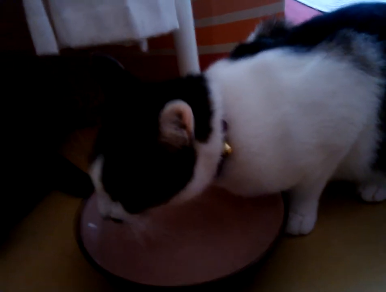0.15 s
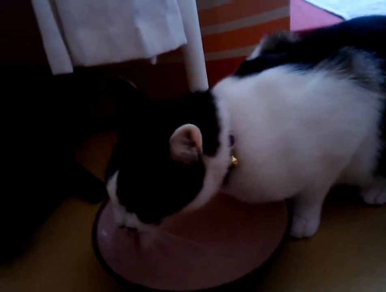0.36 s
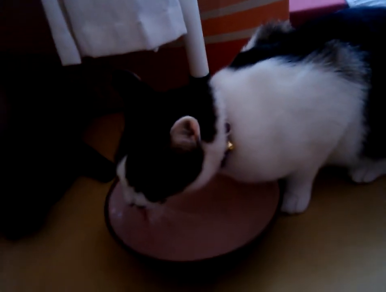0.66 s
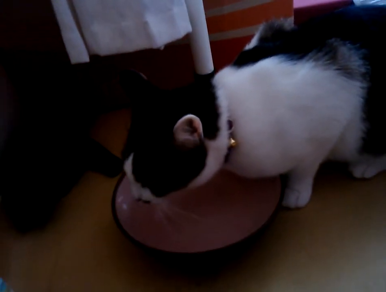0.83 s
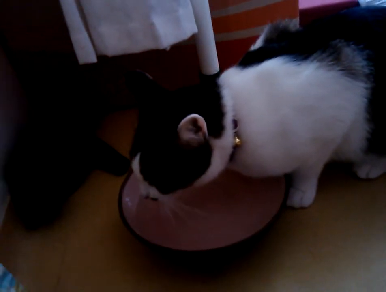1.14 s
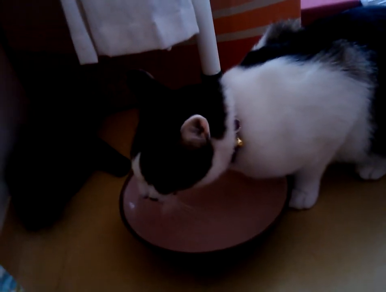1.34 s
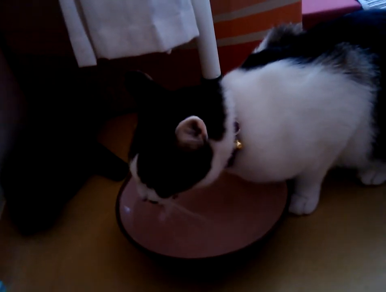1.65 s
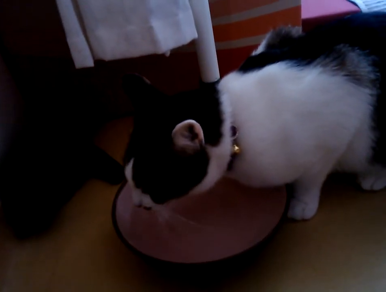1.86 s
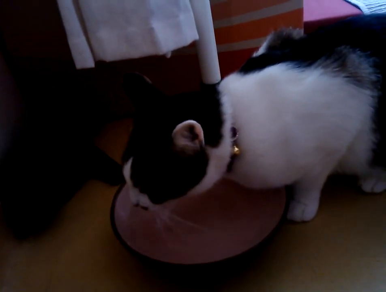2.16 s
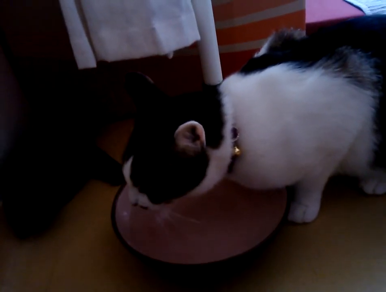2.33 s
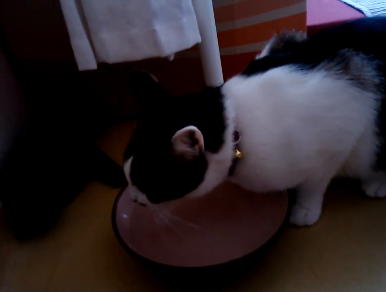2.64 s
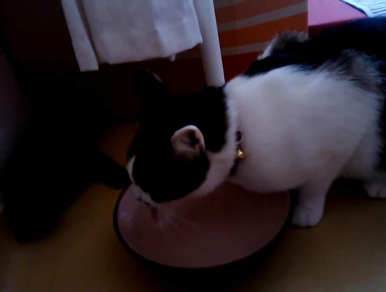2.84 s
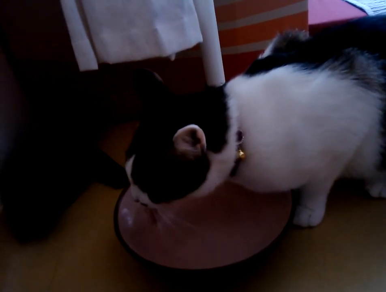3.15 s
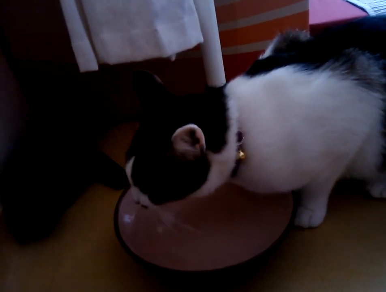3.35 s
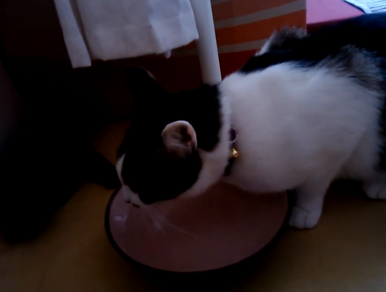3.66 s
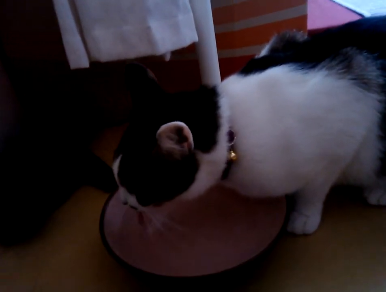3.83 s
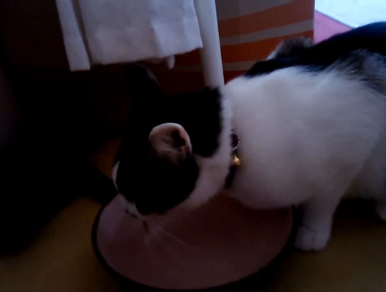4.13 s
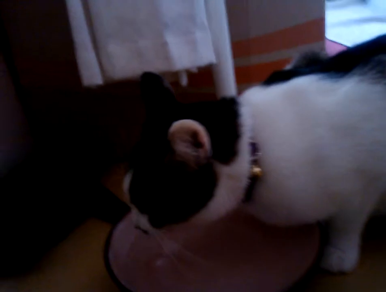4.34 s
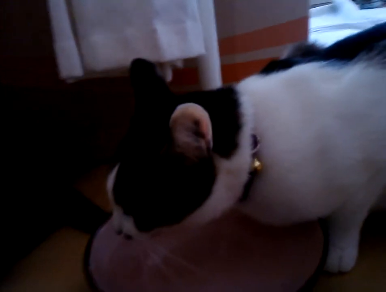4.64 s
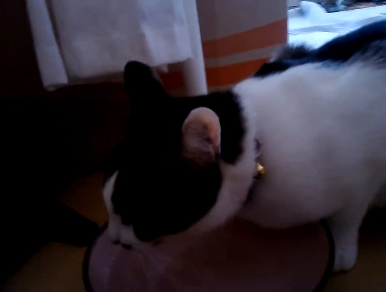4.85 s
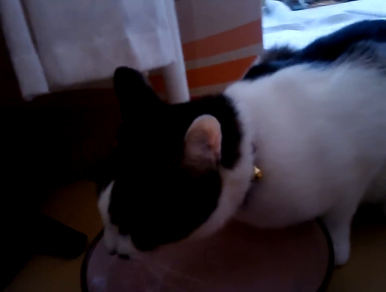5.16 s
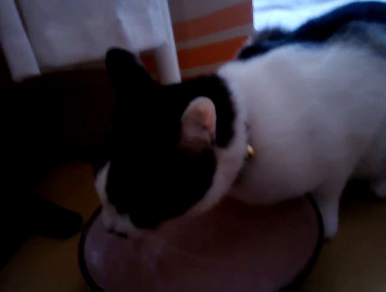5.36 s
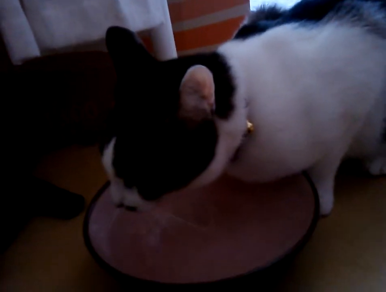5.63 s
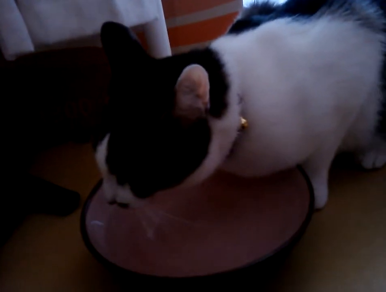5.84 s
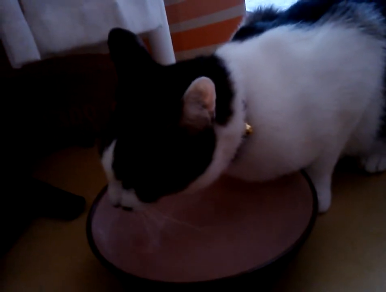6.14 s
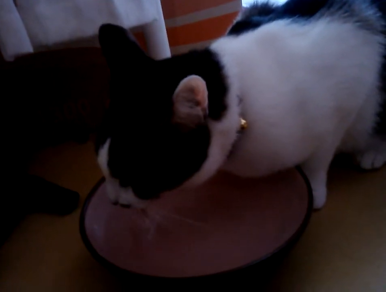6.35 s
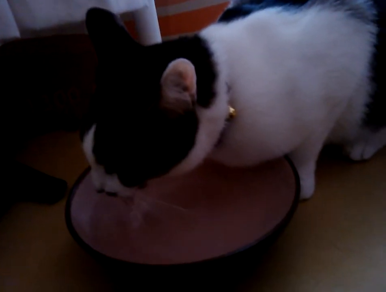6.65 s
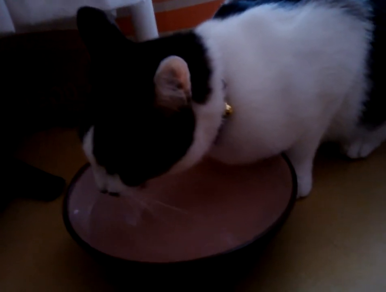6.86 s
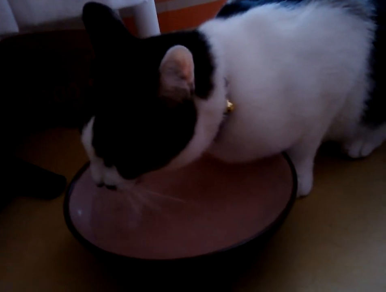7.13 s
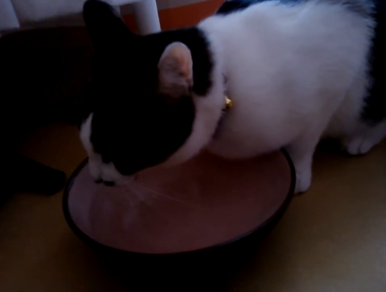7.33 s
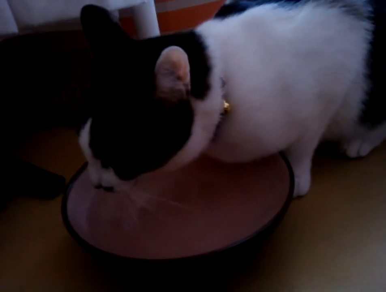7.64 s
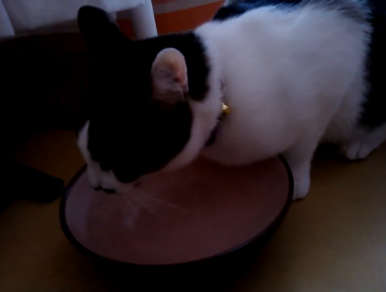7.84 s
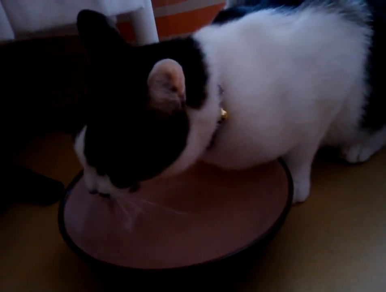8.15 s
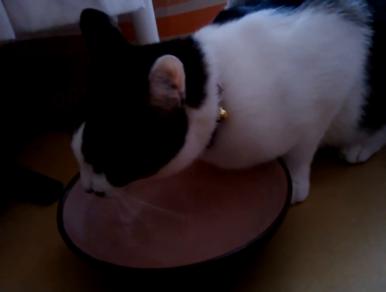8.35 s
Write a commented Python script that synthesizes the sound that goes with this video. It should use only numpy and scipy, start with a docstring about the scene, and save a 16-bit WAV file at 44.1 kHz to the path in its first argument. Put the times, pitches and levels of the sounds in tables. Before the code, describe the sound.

Close to the microphone, a cat drinks from a wide bowl. Small, high, wet clicks come in a loosely steady rhythm of about three laps a second, with scattered popping droplets and dull little plops between. Later laps grow splashier, with sharp bright spits and fine spray. Behind them lie a low wavering room rumble, faint hum and gentle hiss; the small room adds only a short tail.

```python
"""A cat laps water from a wide bowl in a quiet home, about three laps a second.
From the start, filtered noise gives room rumble, a wavering hum and hiss; faint clicks ring in the bowl as a trickle.
Soon the surface plops (single pulses), drops pop (damped sines of rising pitch) and bright noise bursts spit.
Then come the laps: each drags a clump of small bubbles under, with ticks, a dull slosh and stray drops after it.
Later, fine spray flies off the tongue and a few big bubbles gulp; the bowl echoes and the room adds a short tail."""
import sys
import numpy as np
from scipy import signal
from scipy.fft import rfft, irfft, next_fast_len
from scipy.io import wavfile

SR = 44100
rng = np.random.default_rng(int(sys.argv[2]) if len(sys.argv) > 2 else 0)


def log_audio(samples):
    """Write samples as a 16-bit WAV file to the path given in sys.argv[1]."""
    # one column per channel
    frames = np.atleast_2d(samples).T
    # limit to full scale, then quantise
    limited = np.clip(frames, -1, 1)
    pcm = np.round(limited * 32767).astype(np.int16)
    wavfile.write(sys.argv[1], SR, pcm)


N = 374320

# Laps, a clump of bubbles each. Each row: start in seconds, length in seconds,
# loudest moment as a share of the length (0-1), rms level in dB, bubble pitch in Hz.
LAPS = [(0.261, 0.059, 0.66, -59.5, 2280), (0.556, 0.038, 0.2, -57, 2040), (0.584, 0.05, 0.2, -69, 1890),
        (0.865, 0.084, 0.45, -60.5, 2140), (1.157, 0.071, 0.67, -57.5, 2050), (1.253, 0.07, 0.5, -75, 2500),
        (1.478, 0.043, 0.4, -49.5, 2110), (1.518, 0.028, 0.1, -62, 2080), (1.875, 0.047, 0.7, -57.5, 2140),
        (1.983, 0.03, 0.4, -65, 2680), (2.161, 0.027, 0.4, -61, 2250), (2.439, 0.056, 1, -57.5, 1950),
        (2.743, 0.065, 0.7, -61, 2140), (2.969, 0.025, 0.2, -59, 2230), (3.046, 0.045, 0.14, -55.5, 2090),
        (3.327, 0.055, 0.25, -61, 1990), (3.738, 0.036, 0.5, -63.5, 2200), (3.993, 0.09, 0.3, -64, 1970),
        (4.332, 0.069, 0.65, -58.5, 2080), (4.666, 0.044, 0, -58, 2210), (4.949, 0.036, 0.6, -62, 2240),
        (5.195, 0.091, 0.2, -58.5, 1940), (5.484, 0.061, 0.8, -55, 2340), (5.912, 0.036, 0, -58, 2130),
        (6.012, 0.042, 0.5, -67, 2420), (6.209, 0.038, 0.74, -58, 2250), (6.461, 0.081, 0.93, -57.5, 2180),
        (6.775, 0.082, 0.3, -60.5, 2160), (7.084, 0.057, 0.26, -59.5, 2130),
        (7.396, 0.043, 0.13, -53.5, 2270), (7.511, 0.028, 0.4, -62, 2470), (7.679, 0.039, 0.96, -54, 2330),
        (8.098, 0.031, 0.3, -58, 2240), (8.376, 0.039, 0.7, -59, 2310)]
WATER_LOW_HZ, MIC_HIGH_HZ = 1540, 6720   # tiny bubbles radiate no bass; the microphone dulls the top
DROP_LOW_HZ = 2160   # lowest pitch of a stray drop, and the pitch to which the drops' climb refers


def amp(db):
    """dB to gain."""
    return 10 ** (np.asarray(db) / 20)


def rms_one(x):
    """Scale to rms 1."""
    return x / np.sqrt(np.mean(x ** 2) + 1e-20)


def coloured(spectrum):
    """Noise shaped by (Hz, relative dB per Hz) points, then scaled to rms 1."""
    size = next_fast_len(N)
    hz = np.maximum(np.arange(size // 2 + 1) * SR / size, 1)
    points = np.array(spectrum)
    gain = amp(np.interp(np.log(hz), np.log(points[:, 0]), points[:, 1]))
    white = rng.standard_normal(size)
    return rms_one(irfft(rfft(white) * gain, size)[:N])


def resonance(x, hz, width_hz):
    """Two-pole resonance, gain 1 on top."""
    r = np.exp(-np.pi * width_hz / SR)
    forward = np.array([1, 0, -1]) * (1 - r * r) / 2
    feedback = [1, -2 * r * np.cos(2 * np.pi * hz / SR), r * r]
    return signal.lfilter(forward, feedback, x)


def add(out, s, sound):
    """Mix a short sound in at time s."""
    i = int(np.clip(round(s * SR), 0, len(out)))
    out[i:i + len(sound)] += sound[:len(out) - i]


def bubble(hz, t60, rise, attack_s):
    """A damped sine, envelope peak 1, whose pitch climbs by 2 * rise over t60 as the bubble nears the surface."""
    t = np.arange(int(t60 * SR) + 8) / SR
    shape = (1 - np.exp(-t / attack_s)) ** 2 * amp(-60 * t / t60)
    cycles = hz * t * (1 + rise * t / t60)
    return shape / shape.max() * np.sin(2 * np.pi * cycles)


def air():
    """Steady hiss, the rumble under 160 Hz swelling at random and along a set course, and a narrow hum."""
    # Room rumble and hiss. Each row: frequency in Hz, relative level in dB per Hz.
    air_colour = [(28, -47), (41, -19), (52, -3), (78, 2.5), (160, -8.5), (190, -12), (260, -16),
                  (1300, -23), (3500, -28.5), (6300, -31), (7300, -39), (8050, -54), (8800, -50.5),
                  (9500, -45), (10000, -64)]
    # Course of the rumble. Each row: time in seconds, level in dB (only the departure from the mean counts).
    rumble_course = [(0.0, -48), (3.26, -51.5), (3.66, -49.5), (4.68, -52), (4.8, -47.5), (6.22, -51.5),
                     (7.4, -47.5), (8.44, -51), (8.49, -43.5)]
    air_db, hum_db = -48, -58
    hum_hz, hum_width_hz = 119.6, 7.9   # width of each of two passes
    wander_db, wander_hz = 1, 4.9

    noise = coloured(air_colour)
    low = signal.sosfiltfilt(signal.butter(2, 160, fs=SR, output="sos"), noise)
    r = np.exp(-2 * np.pi * wander_hz / SR)
    # the first second lets the slow filter settle
    wander = signal.lfilter([1], [1, -2 * r, r * r], rng.standard_normal(N + SR))[SR:]
    s, db = np.transpose(rumble_course)
    course_db = np.interp(np.arange(N) / SR, s, db - np.mean(db))
    swell = amp(course_db + wander_db * rms_one(wander))
    hum = rng.standard_normal(N)
    for _ in range(2):
        hum = resonance(hum, hum_hz, hum_width_hz)
    return amp(air_db) * (noise + (swell - 1) * low) + amp(hum_db) * rms_one(hum)


def trickle(per_s=60, level_db=-71):
    """Faint stray droplets, random clicks of uneven size, ring in the bowl all along."""
    # Air in the bowl. Each row: resonance in Hz, width of each of two passes in Hz, relative level in dB.
    bowl_modes = [(2095, 600, 1.5), (2380, 1200, -12)]
    size = amp(3.1 * np.minimum(rng.exponential(1, N), 3))
    clicks = (rng.random(N) < per_s / SR) * size
    rings = np.zeros(N)
    for hz, width_hz, db in bowl_modes:
        once = resonance(clicks, hz, width_hz)
        rings += amp(db) * resonance(once, hz, width_hz)
    return amp(level_db) * rms_one(rings)


def plops():
    """The surface closes dully: one pull and one push, centred on the plop's time."""
    # Each row: centre in seconds, nominal level in dB, nominal pitch in Hz.
    plop_rows = [(0.0727, -58, 350), (0.6665, -44, 330), (0.8772, -45, 353), (1.183, -43, 380),
                 (1.4798, -50, 380), (2.466, -44, 453), (2.7655, -42.5, 620), (3.3316, -44, 376),
                 (3.732, -43, 530), (3.8513, -34, 565), (5.1644, -44, 450), (5.2315, -46, 297),
                 (5.476, -42, 410), (5.8499, -41, 403), (5.853, -42, 302), (6.299, -43, 530),
                 (6.4948, -41.5, 413), (6.529, -43, 326), (7.4022, -47, 350), (7.682, -45, 330),
                 (8.0716, -44, 330), (8.0977, -44, 410)]
    out, half = np.zeros(N), 300   # half a plop in samples
    for s, level_db, hz in plop_rows:
        u = np.arange(-half, half) / SR * 2 * np.pi * 0.95 * hz
        pulse = 3.04 * u / (1 + u * u) ** 1.53
        add(out, s - half / SR, amp(level_db) * pulse)
    return out


def strays():
    """Fainter drops fall at random as the water settles after each lap; rows of start, level, pitch and t60."""
    per_lap, mean_wait_s = 4, .12
    base_db, uneven_db, db_per_octave = -53, 3, -6
    above, typical_t60_s = .13, 0.011   # pitch lies an exponential share above the lowest

    wait, height = rng.exponential(1, (2, len(LAPS), per_lap))
    size, ring = rng.standard_normal((2, len(LAPS), per_lap))
    s = np.array(LAPS)[:, :1] + mean_wait_s * wait
    hz = np.minimum(DROP_LOW_HZ * np.exp(above * height), MIC_HIGH_HZ)
    level_db = base_db + uneven_db * size + db_per_octave * np.log2(hz / DROP_LOW_HZ)
    t60 = typical_t60_s * np.exp(.5 * ring)
    return list(zip(s.flat, level_db.flat, hz.flat, t60.flat))


def pops():
    """Each drop traps one bubble; short snaps start faster and smaller bubbles climb more in pitch."""
    # The clearest single bubbles and drops.
    # Each row: start in seconds, peak level in dB, starting pitch in Hz, t60 in seconds.
    clear_drops = [(.0805, -48, 2940, .008), (.1006, -42, 2680, .004), (.1782, -52, 3350, .02),
                   (.2623, -38, 2210, .004), (.2987, -45, 2260, .015), (.3663, -44, 2320, 0.014),
                   (.4154, -45.5, 2400, 0.017), (.492, -37, 2320, 0.0032), (.5358, -39, 1840, .019),
                   (.5754, -39, 2570, .0088), (0.611, -45, 2360, 0.019), (.714, -42.5, 2600, .015),
                   (0.807, -39.5, 2320, .004), (0.8497, -45, 1945, .022), (.875, -41, 1990, 0.016),
                   (0.8877, -38, 2670, 0.006), (.912, -35.5, 2210, .0036), (1.0254, -42, 2700, 0.0036),
                   (1.1551, -40.5, 2040, .018), (1.1826, -30.5, 2360, 0.0033), (1.2048, -36.5, 2140, .013),
                   (1.2633, -48, 2350, .015), (1.308, -42, 2680, .004), (1.3783, -33, 2460, .0088),
                   (1.3965, -43, 2280, .027), (1.4046, -41.5, 2010, 0.0093), (1.4868, -35, 2020, 0.033),
                   (1.672, -46, 2320, 0.017), (1.8012, -43.5, 2010, 0.0085), (1.804, -43.5, 4770, .0045),
                   (1.8852, -37, 2060, 0.0074), (1.9475, -45, 2350, .015), (2.081, -44, 2600, .006),
                   (2.1322, -48.5, 2870, .015), (2.161, -45, 2000, 0.0073), (2.1897, -46, 2350, .015),
                   (2.3204, -43, 2590, .015), (2.3961, -41.5, 2660, .008), (2.435, -37, 1870, 0.013),
                   (2.4645, -39, 2000, .014), (2.4965, -43, 2030, .027), (2.503, -38.5, 2300, 0.0072),
                   (2.603, -39, 2550, 0.015), (2.6905, -29, 2300, .0042), (2.742, -46.5, 4450, .008),
                   (2.762, -47, 2740, 0.0088), (2.7739, -43, 1940, .015), (2.7945, -43, 2420, .011),
                   (2.8408, -41, 2380, 0.019), (2.8843, -35, 2730, 0.0036), (2.8896, -45, 2750, 0.022),
                   (2.928, -41, 4950, .008), (2.9739, -38.5, 2760, 0.0094), (2.9787, -36, 1980, 0.016),
                   (2.9897, -45, 2850, .011), (3.0218, -47, 2760, .006), (3.0534, -38, 2000, 0.0087),
                   (3.0637, -39, 2050, .004), (3.0825, -34.5, 2370, 0.0099), (3.1894, -41.5, 2780, .015),
                   (3.2202, -35.5, 2120, .0065), (3.2612, -34.5, 2800, 0.005), (3.304, -35.5, 2940, 0.0074),
                   (3.3307, -40, 2000, 0.022), (3.3372, -28, 2190, 0.0077), (3.3412, -41, 2060, 0.018),
                   (3.4395, -51, 2240, .015), (3.8269, -49, 2500, .008), (3.8693, -44, 2720, .015),
                   (3.8878, -39.5, 2950, .004), (3.9953, -44, 1860, .017), (4.0374, -48, 3930, 0.013),
                   (4.1735, -47, 3820, 0.022), (4.1826, -46, 3840, .02), (4.1913, -50, 3500, .024),
                   (4.2993, -46.5, 1700, .02), (4.3237, -39.5, 2590, .015), (4.3324, -40, 2130, .011),
                   (4.5567, -34, 3100, .004), (4.5738, -45, 2590, .011), (4.612, -45.5, 2440, 0.013),
                   (4.661, -43, 1990, .008), (4.675, -43, 2190, 0.0031), (4.7968, -43.5, 3420, 0.012),
                   (4.8237, -50, 2750, .02), (4.8808, -44, 2600, .011), (4.8863, -42.5, 3040, 0.01),
                   (4.959, -37.5, 3070, .006), (4.9644, -32.5, 2280, .011), (4.9705, -37, 2250, .0096),
                   (5.0788, -45, 3000, .011), (5.1014, -40, 4730, 0.012), (5.1188, -44, 2500, .004),
                   (5.1281, -45, 2350, .006), (5.162, -24.5, 2690, 0.0026), (5.2, -29.5, 1820, 0.0088),
                   (5.2124, -39, 1690, 0.02), (5.2293, -43, 2260, .027), (5.2425, -30, 2330, 0.01),
                   (5.248, -39, 2410, 0.021), (5.2736, -47, 1500, 0.006), (5.275, -31.5, 4390, 0.016),
                   (5.363, -46, 5800, .004), (5.4083, -47, 2130, .011), (5.4404, -41, 2200, .0073),
                   (5.461, -39, 2220, .011), (5.481, -32.5, 2280, .008), (5.4978, -40.5, 1600, .016),
                   (5.5108, -41, 2210, .008), (5.5192, -35, 2170, 0.0081), (5.529, -37, 2375, 0.028),
                   (5.5389, -37, 2280, .008), (5.5564, -44, 1740, 0.018), (5.6068, -41, 2940, .004),
                   (5.618, -43.5, 2280, .008), (5.7326, -19.5, 2580, 0.0023), (5.7345, -36, 4680, .012),
                   (5.745, -44, 2270, .01), (5.8345, -47, 2140, .011), (5.835, -45, 4470, .008),
                   (5.927, -41, 2320, 0.017), (5.9386, -41, 2220, 0.013), (6.0357, -51, 4860, .01),
                   (6.0494, -44.5, 3250, .004), (6.1168, -43, 3220, 0.012), (6.1587, -44, 2000, .0065),
                   (6.1819, -44, 2260, .008), (6.2293, -41, 2165, 0.032), (6.3318, -32.5, 2820, 0.0045),
                   (6.3498, -38, 3720, 0.015), (6.4196, -34, 2630, 0.0043), (6.4566, -36, 1970, .0085),
                   (6.4803, -41, 1940, .006), (6.4915, -34, 2180, 0.0035), (6.7483, -43, 2000, .008),
                   (6.7552, -38.5, 3240, 0.0027), (6.7678, -35.5, 1880, .006), (6.8015, -34, 2150, 0.0062),
                   (6.952, -40.5, 3760, 0.015), (7.0661, -47, 1800, .013), (7.0912, -42, 2760, 0.0073),
                   (7.106, -43, 2140, .004), (7.1291, -46, 2130, .02), (7.228, -42, 2880, .015),
                   (7.2342, -39.5, 3440, 0.01), (7.3235, -31.5, 2900, 0.0037), (7.3706, -41, 2270, .011),
                   (7.4008, -38, 2270, 0.017), (7.4076, -31, 2250, 0.0067), (7.429, -38, 2270, 0.018),
                   (7.4613, -41, 5560, .0031), (7.48, -40, 4220, .0055), (7.5734, -42.5, 2350, .011),
                   (7.6101, -42, 2340, .027), (7.6465, -37.5, 2000, .008), (7.6793, -41, 2240, 0.018),
                   (7.6983, -29, 2260, .008), (7.707, -40, 2350, 0.012), (7.9278, -45, 2850, .011),
                   (7.9647, -37.5, 2450, .004), (7.9654, -49, 4700, .02), (7.9812, -42, 2300, .008),
                   (8.0244, -38, 4900, 0.0036), (8.0244, -46, 2120, .011), (8.0969, -41.5, 2210, .015),
                   (8.1087, -41, 2380, 0.021), (8.1161, -39.5, 2130, 0.011), (8.2196, -36.5, 3060, 0.0039),
                   (8.2908, -40, 2174, .006), (8.2974, -44, 3430, 0.0087), (8.3725, -33, 2230, .0052),
                   (8.399, -38, 2313, 0.034), (8.4034, -42, 2370, 0.016)]
    out = np.zeros(N)
    for s, level_db, hz, t60 in clear_drops + strays():
        rise = .05 * (hz / DROP_LOW_HZ) ** 0.7
        add(out, s, amp(level_db) * bubble(hz, t60, rise, attack_s=0.0002 + 0.024 * t60))
    return out


def spits():
    """Short wet bursts of bright noise as the tongue tears free."""
    # Each row: start in seconds, level in dB from which the burst decays.
    spit_rows = [(0.177, -57), (0.399, -53), (.8066, -54), (1.5065, -56), (1.8013, -53), (2.0, -52),
                 (2.396, -51.5), (2.6234, -53), (4.181, -52), (4.341, -55), (4.9511, -55), (5.1613, -48.5),
                 (5.273, -31.5), (5.3634, -47.5), (5.4385, -48.5), (5.562, -49), (5.7323, -39),
                 (5.834, -48.5), (6.0347, -54), (6.118, -47), (6.2976, -54), (6.622, -48), (6.87, -51),
                 (6.8952, -53), (7.004, -53.5), (7.0284, -49.5), (7.3228, -47), (7.3916, -53),
                 (7.4415, -54), (7.4604, -49.5), (7.479, -49), (7.572, -51), (7.7165, -53), (8.0235, -40),
                 (8.105, -57), (8.1988, -53), (8.2197, -51.5), (8.291, -44)]
    # Colour of the noise. Each row: frequency in Hz, relative level in dB per Hz.
    spit_colour = [(710, -49), (1200, -11), (2630, -7.5), (3900, -7), (4530, -12), (5720, -2),
                   (7540, -13.5), (8770, -20.5), (10100, -32), (13200, -74), (22000, -120)]
    t60_s, attack_s = 0.025, .0013
    envelope = np.zeros(N)
    t = np.arange(int(t60_s * SR)) / SR
    attack = np.minimum(t / attack_s, 1)
    for s, level_db in spit_rows:
        add(envelope, s, amp(level_db - 60 * t / t60_s) * attack)
    return envelope * coloured(spit_colour)


def clumps(table, per_s, spread, cycles, uneven_db, end):
    """Bubbles are born in a quick, loosely even train under a swell, pitches scattered round the clump's own.

    A clump holds at most 200; cycles sets each bubble's t60 in periods, end the swell's last gain."""
    out = np.zeros(N)
    for s, length, loudest, level_db, hz in table:
        jitter = rng.random(200)
        scatter = rng.standard_normal((200, 2))
        count = min(per_s * length, len(jitter))
        clump = np.zeros(int((length + 0.014) * SR))   # room for the last bubbles to ring
        for k, (pitch, size) in enumerate(scatter):
            born = (k + jitter[k]) / count   # share of the length
            if born < 1:
                swell = np.interp(born, [0, np.clip(loudest, .05, .95), 1], [.25, 1, end])
                # later bubbles are smaller
                own_hz = min(hz * np.exp(spread * pitch + 0.082 * (born - .5)), 7000)
                one = bubble(own_hz, cycles / own_hz, 0.055, 0.00066)
                add(clump, born * length, swell * amp(uneven_db * size) * one)
        over_length = np.sqrt(len(clump) / SR / length)   # refer the rms to the length without the ring
        add(out, s, amp(level_db) * rms_one(clump) * over_length)
    return out


def laps():
    """Each lap drags a clump of small bubbles under."""
    return clumps(LAPS, per_s=135, spread=0.074, cycles=22, uneven_db=2.5, end=0.31)


def crackle():
    """The tongue's edge breaks into short ticks, widely spread in pitch, within each lap."""
    ticks = clumps(LAPS, per_s=130, spread=0.22, cycles=10, uneven_db=0.5, end=0.33)
    return amp(-2.0) * ticks   # against the lap's bubbles


def slosh():
    """The tongue stirs the water: dull noise that swells with each lap."""
    low_hz, high_hz = 294, 990
    against_bubbles_db = -2.5   # top of the swell against the lap's level
    envelope = np.zeros(N)
    for s, length, _, level_db, _ in LAPS:
        swell = np.hanning(int(0.96 * length * SR))
        add(envelope, s, amp(level_db + against_bubbles_db) * swell)
    band = signal.butter(2, [low_hz, high_hz], "band", fs=SR, output="sos")
    return envelope * rms_one(signal.sosfilt(band, rng.standard_normal(N)))


def spray():
    """Fine spray thrown off the tongue: dense clumps of tiny, high bubbles."""
    # Each row: start in seconds, length in seconds, loudest moment as a share of the length (0-1),
    # rms level in dB, droplet pitch in Hz.
    spray_rows = [(1.155, 0.042, .5, -65.5, 3880), (4.166, 0.025, 0.54, -56.5, 3640),
                  (4.53, 0.044, 0.2, -67, 4500), (4.88, 0.19, 0.37, -65, 4900),
                  (5.08, 0.067, 0.5, -62.5, 4800), (5.228, .025, 0.4, -62, 4200),
                  (5.277, 0.056, 0.5, -58.5, 5270), (5.32, 0.27, 0.3, -66, 5250),
                  (5.734, 0.0085, 0.4, -51.5, 4230), (5.836, 0.036, 0, -67, 4800),
                  (6.335, 0.023, 0.9, -60, 3840), (6.945, .025, 0.3, -61.5, 3770),
                  (7.325, 0.066, .1, -68, 5250), (7.43, 0.071, 0.35, -61, 4900),
                  (8.026, 0.047, 0.1, -65, 5760), (8.195, .07, 0.3, -63, 5000),
                  (8.292, 0.032, 0, -68, 5100)]
    return clumps(spray_rows, per_s=2700, spread=0.24, cycles=19, uneven_db=5.0, end=0.11)


def gulps():
    """Big, low bubbles close with a rising gulp."""
    # Each row: start in seconds, peak level in dB, starting pitch in Hz.
    gulp_rows = [(3.0505, -40, 480), (7.692, -46, 480), (7.862, -43.5, 440)]
    out = np.zeros(N)
    for s, level_db, hz in gulp_rows:
        add(out, s, amp(level_db) * bubble(hz, t60=0.012, rise=0.33, attack_s=.0015))
    return out


def bowl_echoes(x):
    """The far wall of the bowl sends each sound back."""
    # Each row: delay in seconds, level against the direct sound in dB.
    echo_rows = [(.0036, -15.5), (.0068, -16)]
    out = x.copy()
    for s, level_db in echo_rows:
        add(out, s, amp(level_db) * x)
    return out


def room(x, t60=0.12, level_db=-18):
    """A short diffuse tail from bowl, floor and walls: decaying noise after a 2 ms gap."""
    t = np.arange(int(t60 * SR)) / SR
    tail = rng.standard_normal(len(t)) * amp(-60 * t / t60) * (t > .002)
    unit_tail = tail / np.sqrt(np.sum(tail ** 2))
    return amp(level_db) * signal.fftconvolve(x, unit_tail)[:N]


def scene():
    """Water sounds with their echoes and room tail, over the air of the room."""
    bubbles = trickle() + pops() + laps() + crackle() + spray()
    band = signal.butter(3, [WATER_LOW_HZ, MIC_HIGH_HZ], "band", fs=SR, output="sos")
    bright = signal.sosfilt(band, bubbles) + spits()
    water = bowl_echoes(bright) + plops() + slosh() + gulps()
    return (water + room(water) + air())[None, :]


def record(dry):
    """The top is cut, 60 dB down from 10.4 kHz up; a trace of converter noise stays."""
    top_cut = signal.cheby2(12, 60, 10400, fs=SR, output="sos")
    return signal.sosfilt(top_cut, dry) + amp(-102) * rng.standard_normal(dry.shape)


dry = scene()
out = record(dry)
log_audio(out)
```